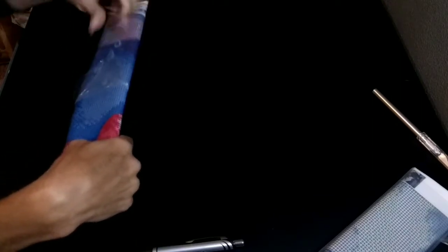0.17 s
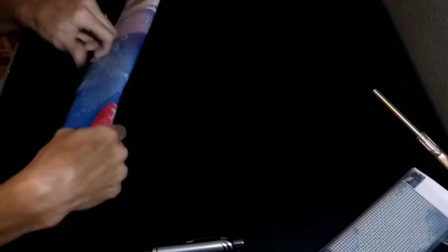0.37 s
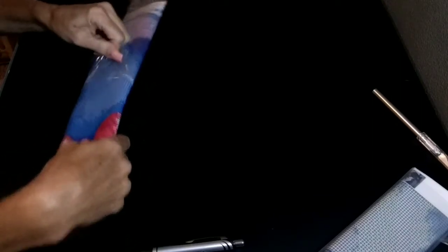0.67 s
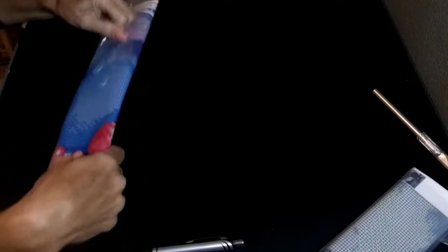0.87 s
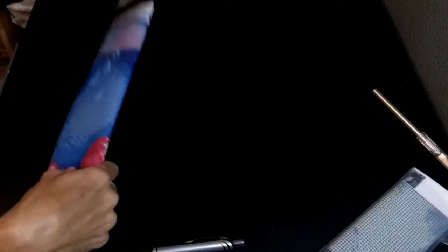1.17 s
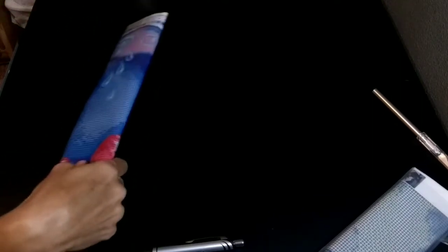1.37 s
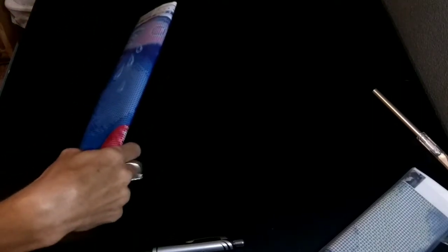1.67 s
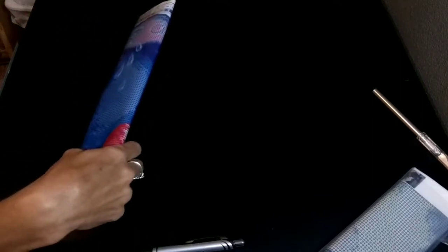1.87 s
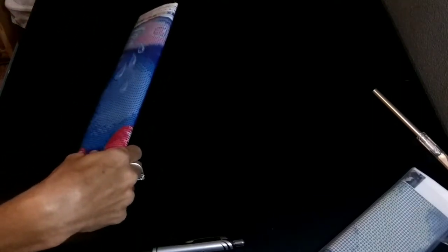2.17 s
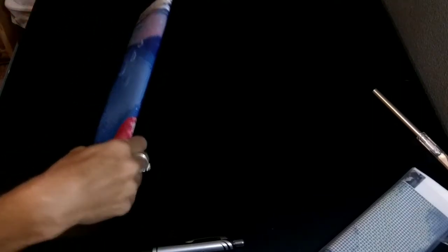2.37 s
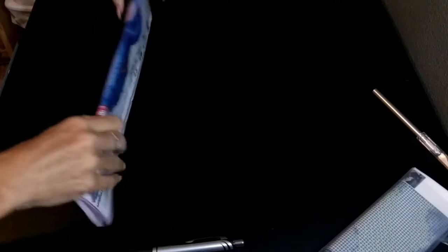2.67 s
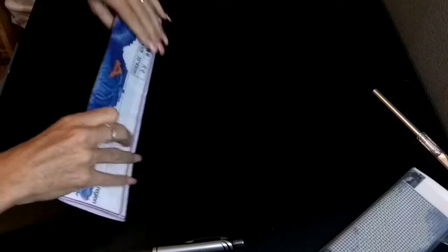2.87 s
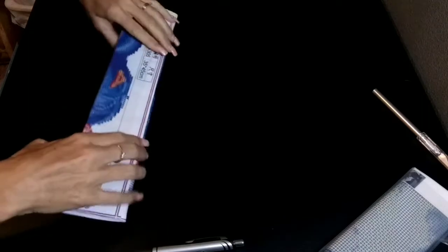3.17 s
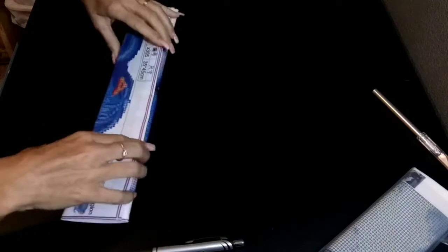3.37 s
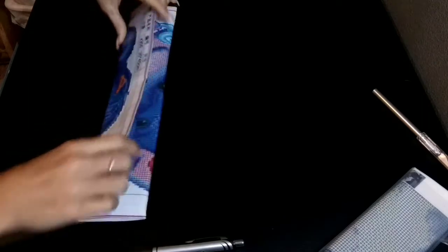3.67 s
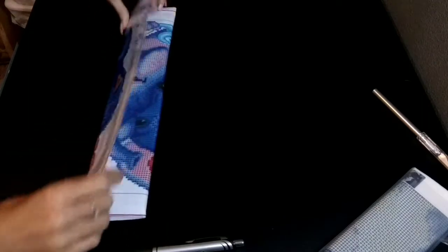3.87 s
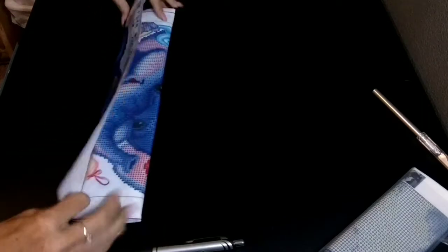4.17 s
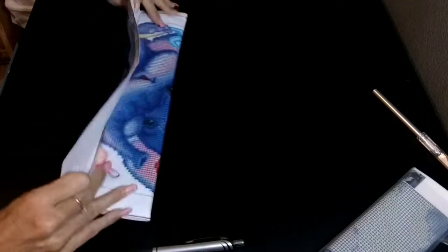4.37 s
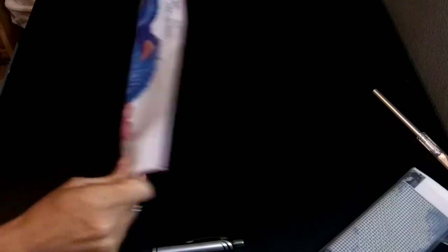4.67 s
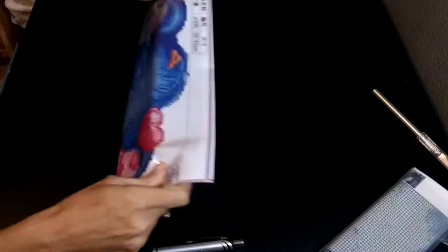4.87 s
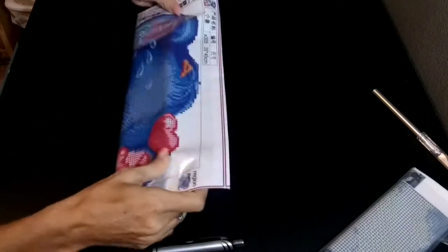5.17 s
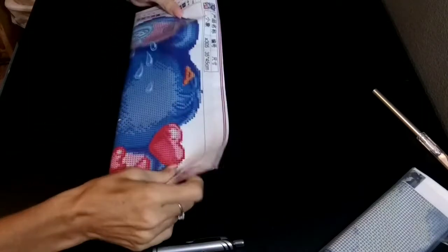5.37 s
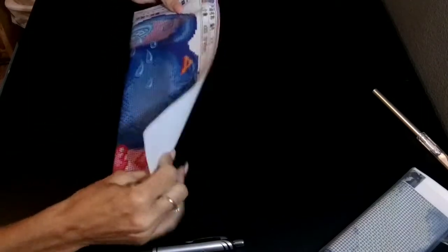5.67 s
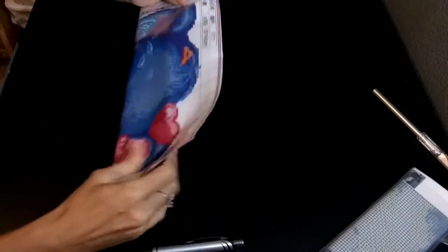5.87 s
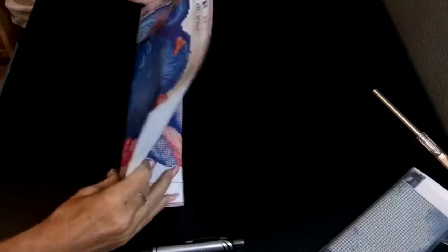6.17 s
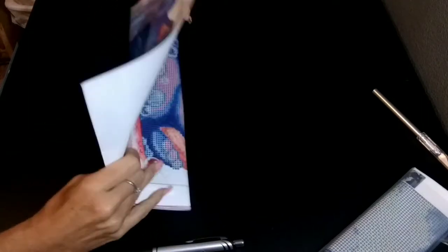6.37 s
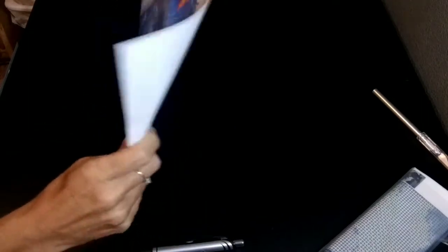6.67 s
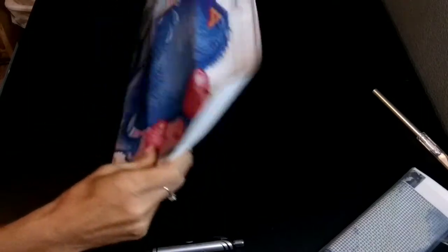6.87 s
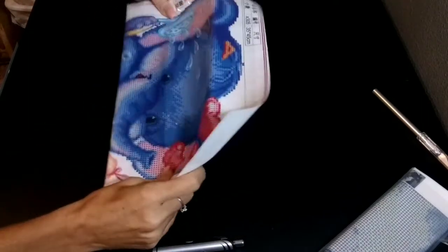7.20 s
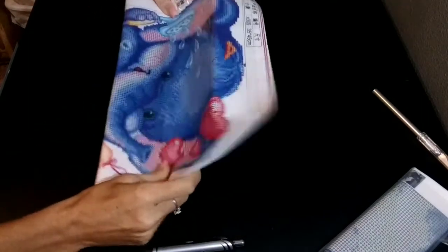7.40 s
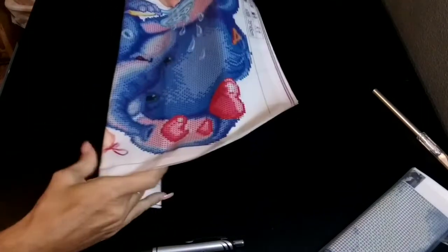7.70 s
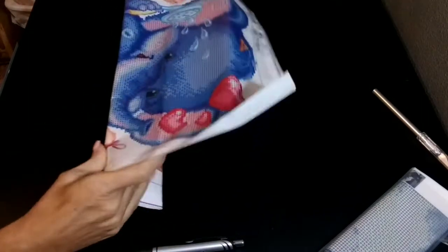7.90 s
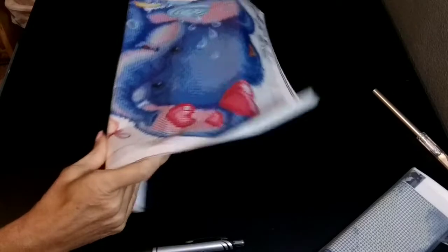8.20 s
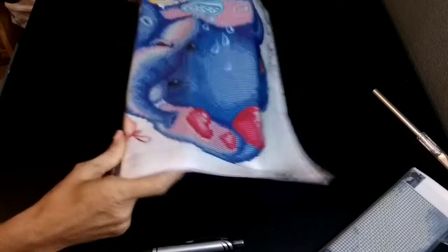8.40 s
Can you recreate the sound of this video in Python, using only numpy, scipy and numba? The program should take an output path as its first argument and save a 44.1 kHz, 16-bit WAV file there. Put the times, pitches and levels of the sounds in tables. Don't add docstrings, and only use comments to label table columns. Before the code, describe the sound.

Thin crisp film crackles and slides off a stiff coated sheet, then the sheet unrolls with rattling snaps and low hollow desk thumps.

```python
import sys
import numpy as np
from scipy import signal
from scipy.fft import rfft, irfft
from scipy.io import wavfile
from scipy.ndimage import uniform_filter1d
from numba import njit

SR = 44100
rng = np.random.default_rng(int(sys.argv[2]) if len(sys.argv) > 2 else 0)


def field_ratio(decibels):
    return 10 ** (np.asarray(decibels, dtype=float) / 20)


def digitize_waveform(pressure):
    field = np.atleast_2d(pressure).T
    bounded = np.clip(field, -1, 1)
    quanta = np.round(bounded * 32767).astype(np.int16)
    wavfile.write(sys.argv[1], SR, quanta)


N = 376613

# frequency in Hz, density in dB per Hz.
AIR_SPECTRUM = [(30, 2), (80, 11.5), (300, -2.5), (700, -11), (1500, -12), (4000, -16.5), (8000, -32),
                (16000, -21.5)]
# frequency in Hz, density in dB per Hz.
DRIFT_SPECTRUM = [(2, -15), (30, -10.5), (300, -21.5), (16000, -64)]
# frequency in Hz, gain in dB, time to fall 60 dB in seconds.
DESK_MODES = [(83, -3, 0.43), (105, 0.5, 0.18), (139, 7.5, 0.28), (176, 6, 0.31), (206, -1, 0.23),
              (266, 1.5, 0.2), (331, -5.5, 0.058), (398, -3.5, 0.22), (496.6, -9.5, 0.23),
              (545.5, -5.5, 0.32), (640, -9, 0.15)]
# frequency in Hz, width in Hz, gain in dB.
SHEET_MODES = [(430, 78, 0), (586, 47, 6), (640, 105, 4), (747, 166, 6.5), (960, 300, 4.5),
               (1216, 402, 5.5), (1714, 1260, -5.5)]
# frequency in Hz, width in Hz, gain in dB.
COATING_MODES = [(2340, 590, 1), (3550, 3170, 6), (4530, 3860, 2)]
# frequency in Hz, density in dB per Hz.
FILM_SPECTRUM = [(3000, -9.5), (5500, -7.5), (7500, -6), (10000, -1), (12500, -4.5), (15500, 2.5)]
# frequency in Hz, density in dB per Hz.
WRAP_SPECTRUM = [(3000, -5), (6000, -5.5), (10000, -3.5), (15500, -5.5)]
# start in seconds, level in dB, pitch struck in Hz, push length in seconds.
DESK_BLOWS = [(1.256, -40.5, 143, 0.0016), (1.3, -38.5, 83, 0.0064), (2.212, -44.5, 226, 0.0034),
              (3.17, -49, 298, 0.0029), (3.41, -40, 162, 0.0044), (4.28, -36, 413, .004),
              (6.199, -38, 406, 0.0064), (6.312, -32.5, 516, 0.0054), (3.387, -38.5, 272, 0.0078),
              (3.389, -38.5, 119, 0.0042), (3.88, -50, 266, 0.032), (4.0, -54, 272, 0.0097),
              (4.15, -45.5, 266, 0.0071), (4.278, -22.5, 139, 0.0046), (4.283, -32.5, 265, 0.0054),
              (5.12, -50, 135, 0.0039), (5.297, -41, 126, 0.0025), (5.3, -36.5, 288, 0.0014),
              (6.115, -40.5, 262, 0.0053), (6.184, -44, 330, 0.0022), (6.2, -30.5, 136, 0.0043),
              (6.205, -33, 250, 0.0053), (6.298, -34, 140, 0.0025), (6.311, -28, 134, 0.0077),
              (6.324, -32, 220, 0.0034), (6.574, -36.5, 145, 0.0019), (6.62, -41, 82, 0.0064),
              (6.725, -49, 85, 0.0078), (6.728, -40.5, 242, 0.0017), (7.02, -40.5, 105, 0.004),
              (7.022, -40.5, 266, 0.0043), (7.06, -39, 87, 0.0051), (7.227, -33, 139, 0.0016),
              (7.228, -43, 305, 0.0017), (8.47, -42, 100, 0.013)]
# start in seconds, level in dB, fold pitch in Hz, crack in dB re
SNAPPING_FOLDS = [(0.026, -40.5, 540, -22), (0.339, -30, 650, -22), (0.707, -40.5, 563, 4),
                  (1.26, -37, 730, -12), (2.141, -34, 1290, 3), (2.214, -40, 493, -4), (2.952, -39.5, 457, 8.5),
                  (3.39, -42.5, 430, -19), (4.015, -41, 970, -1), (4.27, -19, 1260, -3.5),
                  (4.277, -17.5, 520, -7), (4.288, -33, 640, -6), (4.954, -34.5, 780, -18),
                  (5.267, -37, 655, -12.5), (5.301, -29.5, 960, -16), (5.747, -27.5, 1320, -15),
                  (6.0402, -30, 1300, -18), (6.114, -40.5, 418, 3), (6.185, -35, 1280, -19),
                  (6.197, -26.5, 397, -30), (6.299, -21.5, 1270, -1), (6.311, -23, 460, -1.5),
                  (6.5743, -29, 453, -18), (7.021, -34.5, 480, -20), (7.2256, -16.5, 1340, -9),
                  (7.2344, -23, 756, -20), (7.243, -28.5, 790, -22), (7.644, -39.5, 980, 6),
                  (7.791, -39.5, 960, -6), (8.352, -32, 1320, -12), (8.449, -28.5, 740, -19),
                  (.585, -47, 860, 5), (.693, -48, 460, -1.5), (.36, -49, 690, -25), (1.48, -44, 1300, 0),
                (3.148, -46.5, 650, -20), (6.054, -36, 800, -15), (4.16, -48, 620, -18),
                (4.19, -46, 640, -20), (6.258, -35, 640, -13), (6.727, -42.5, 430, 9),
                (6.742, -30.5, 1170, -7), (6.89, -47, 1100, -6), (7.114, -39, 1060, -12),
                (7.154, -42, 974, -16), (7.899, -37, 1360, 7), (8.275, -35, 810, -4), (8.41, -33, 560, -15),
                (8.428, -31, 600, -19), (3.17, -41, 1450, 6), (6.2, -42, 650, -20), (7.04, -38.5, 400, -27),
                (8.312, -40, 900, 5)]
# peak in seconds, sheet level in dB, swell in seconds per 10 dB,
# fade in seconds per 10 dB, film brightness in dB.
PULL_STROKES = [(.03, -52, 6, 0.02, -6), (.31, -60, 0.11, 0.04, 1.5), (.59, -57, 0.13, 0.06, 2.5),
                (0.713, -51.5, 0.03, 0.02, 1), (.95, -49.5, 0.13, 0.1644, 3.5), (1.2, -54, 0.04, 0.04, 2.5),
                (1.26, -57, 0.1, 0.26, 0), (1.49, -57.5, -0.23, 0.17, 10.5), (1.54, -62.5, -0.6, 0.21, 0),
                (1.71, -61, -0.39, 0.06, 11), (1.81, -62.5, -0.46, 0.01, 14), (2.04, -67, -0.13, 0, 12),
                (2.15, -58, 0.17, 0, 5), (2.226, -52, 0.07, 0.07, 2)]
TURN_STROKES = [
    (2.5, -57.5, 0.28, 0.18, -7.5),
    (2.75, -62.5, 0.055, .06, -7),
    (2.83, -51, 0.089, 0.068, -17.5),
    (2.97, -51.5, 0.044, 0.051, -12.5),
    (3.19, -55, 0.043, 0.11, -12),
    (3.32, -71, .03, .05, -6),
    (3.69, -60, 0.14, 0.37, -7),
    (4.02, -59.5, 0.19, 0.074, -0.5),
    (4.2, -55, 0.056, 0.057, -9),
]
UNROLL_STROKES = [(4.3, -47.5, 0.064, 0.09, -5.5), (4.71, -54.5, 0.46, 0.029, -6),
                  (4.92, -59, 0.49, 0.24, 1), (5.07, -64, .1, 0.089, 7.5), (5.33, -50, 0.14, 0.055, -2),
                  (5.56, -54.5, 0.13, 0.072, 1), (5.8, -60, 0.12, 0.15, 8.5), (6.09, -51, 0.34, 0.1, -3.5),
                  (6.3, -48, 0.1, 0.11, -12), (6.42, -61, 0.1, 0.17, 6.5), (6.54, -53.5, 0.048, 1, -3),
                  (6.78, -60, 0.14, 0.053, 9), (6.94, -54.5, 0.045, 0.11, 6.5),
                  (7.16, -72, 0.036, 0.13, -4), (7.23, -48, 0.024, 0.07, -4), (7.32, -54, 0.19, 0.019, 5.5),
                  (7.518, -50.5, 0.12, 0.071, 2), (7.59, -60, 0.045, 0.06, 4), (7.65, -55, 0.07, 0.16, 1.5),
                  (7.91, -52.5, 0.11, 0.091, 2), (8.11, -57, 0.046, .1, 5), (8.21, -53.5, 0.13, 0.14, 0.5),
                  (8.3, -48.5, 0.12, 0.034, -5), (8.33, -55, 0.033, 0.1, 8.5), (8.49, -41, 0.1, 0.077, -7)]
SKIN_STROKES = [
    (1.48, -64, -0.07, 0.1, 2),
    (1.699, -64, 0, 0.06, -1),
    (1.8, -73, -0.4, 0, -5),
    (2.24, -64, 0.22, -0.18, -13),
    (3.04, -69, -0.26, 0, -15),
    (3.199, -65.5, 0, 0.1, -16),
    (3.85, -70, 0.2, 0.13, -11.5),
    (6.75, -61, -0.07, 0, -4),
]
TASK_SLIDE_DB = [-3, -2.5, -4.5, 14]
SLIDE_SHARE = 0.54
STILL_HANDS_DB = [-71.5, -88, -94]
# start in seconds, peak level in dB, pitch in Hz.
WRAP_TICKS = [(0.4935, -44, 9900), (0.4962, -47, 8600), (0.5305, -41, 5800), (0.5366, -46, 7400),
              (0.5548, -39, 10500), (0.5692, -40, 9400), (0.5849, -31.5, 5400), (0.5873, -29.5, 7300),
              (0.611, -31.5, 9000), (0.6949, -46, 8000), (0.7057, -56, 7300), (0.7628, -31.5, 9500),
              (0.8086, -38.5, 7800), (0.8184, -40, 7100), (0.8239, -47, 9700), (0.8676, -34, 8900),
              (0.8806, -42, 8900), (0.9392, -32, 9500), (0.943, -27, 9100), (0.9732, -27.5, 11700),
              (0.9924, -30, 11400), (1.0072, -29.5, 11500), (1.03, -29.5, 8000), (1.2077, -28.5, 9800),
              (1.2635, -32, 9500), (1.2993, -39, 9900), (1.4807, -40, 5000), (1.484, -38, 4800),
              (1.5175, -29, 4670), (1.522, -38, 6000), (1.5646, -35.5, 6700), (1.5705, -35, 10700),
              (1.5866, -37, 10400), (1.5925, -52, 7400), (1.6062, -42, 8300), (1.642, -33, 10500),
              (1.6537, -32.5, 7300), (1.6965, -29.5, 5600), (1.698, -30.5, 8400), (1.7152, -38, 6900),
              (1.7834, -37, 9200), (1.8005, -35.5, 8900), (1.8742, -41, 8900), (1.962, -34.5, 8800),
              (2.0242, -39.5, 9600), (2.0267, -40, 10000), (2.1429, -27, 9500), (2.145, -30, 11400),
              (2.1612, -37, 10800), (2.178, -36, 8400), (2.2064, -38, 9400), (2.8307, -40, 8060),
              (2.9102, -44, 10600), (2.9519, -45, 5600), (3.9709, -42, 10700), (4.0182, -39, 8500),
              (4.175, -49, 8800), (4.271, -44, 4900), (4.274, -39, 4200), (4.29, -37, 9500)]
FIRST_FLAP_TICKS = [(4.361, -32.5, 11700), (4.3629, -34, 11100), (4.3679, -36.5, 12900),
                    (4.4042, -35, 12400), (4.4936, -33.5, 8250), (4.542, -37, 12600),
                    (4.5784, -36.5, 10300), (4.6101, -51, 11800), (4.7418, -31, 10900),
                    (4.7483, -31, 12900), (4.823, -37, 11700), (4.8404, -36, 10800), (4.9109, -44, 9800),
                    (4.9574, -33, 10100), (5.004, -32, 11300), (5.0061, -38, 12100), (5.0141, -36, 12400),
                    (5.051, -32, 10100), (5.057, -32, 10700), (5.0662, -41, 11600), (5.0941, -37, 13200),
                    (5.1467, -35.5, 12200), (5.1847, -31, 11600), (5.1888, -34, 12900), (5.19, -28, 13600),
                    (5.198, -39, 13000), (5.2086, -34, 12500), (5.216, -39, 12500), (5.242, -26.5, 13400),
                    (5.2811, -35, 6600), (5.3011, -30, 12900), (5.3362, -37, 9900), (5.3927, -43, 11500),
                    (5.409, -40, 12200), (5.48, -34, 10000), (5.4835, -36, 12900), (5.5125, -37, 12100),
                    (5.5527, -37, 12900), (5.573, -33, 12000), (5.581, -31, 12600), (5.686, -34.5, 9500),
                    (5.6917, -30.5, 10800), (5.695, -28, 12200), (5.7026, -34, 12800), (5.7656, -34, 11300),
                    (5.7796, -32, 13800), (5.8254, -44, 11600), (5.8357, -31, 10200), (5.8638, -45, 10900),
                    (5.9107, -44, 12700), (5.9278, -39, 13700), (5.9427, -38, 12800), (5.9704, -39, 10800),
                    (6.0579, -39, 10200), (6.098, -32, 10500), (6.1014, -36, 10700), (6.1354, -22, 11100)]
SECOND_FLAP_TICKS = [(6.2305, -43, 11700), (6.2528, -38, 10200), (6.2758, -38, 9900), (6.2979, -48, 4800),
                     (6.3843, -39, 12200), (6.431, -40, 12400), (6.6193, -37, 10600), (6.662, -38, 10400),
                     (6.7584, -30, 13500), (6.8323, -42, 10000), (6.8416, -43, 11500), (6.9129, -36, 10600),
                     (6.919, -34, 12800), (6.9303, -36.5, 12000), (6.9255, -36, 12000),
                     (6.9405, -29, 12900), (6.947, -33, 12000), (6.9604, -27, 11700), (7.0225, -32, 11800),
                     (7.0326, -40, 10800), (7.0346, -34, 11100), (7.0752, -54, 12100), (7.1044, -43, 11000),
                     (7.1147, -35, 8400), (7.1212, -41, 10900), (7.1762, -38, 8700), (7.192, -39, 13700),
                     (7.1995, -34, 13000), (7.2958, -41, 8700), (7.2999, -40, 13000), (7.314, -42, 10500),
                     (7.3235, -38, 10500), (7.4285, -42, 11600), (7.4373, -29, 13300),
                     (7.5037, -31.5, 10000), (7.646, -42, 10900), (7.6533, -34, 13800),
                     (7.7047, -38, 12300), (7.741, -39, 10300), (7.7725, -38, 10900), (7.787, -40, 11900),
                     (7.9016, -33, 11900), (7.906, -33, 7100), (7.9082, -38, 10900), (7.9967, -36, 10400),
                     (8.0146, -39, 11000), (8.0516, -37, 8300), (8.0591, -46, 10200), (8.103, -30, 8000),
                     (8.1423, -30, 9100), (8.1575, -31, 11300), (8.2406, -29, 9900), (8.3032, -42, 11800),
                     (8.3149, -28, 13100), (8.43, -36, 9100), (8.4768, -29, 9300), (8.4906, -23, 12300)]
COATING_SHARE_DB = [-12.5, -30, -25]
# start in seconds, level in dB.
DULL_CRACKS = [(0.604, -40), (4.018, -37), (4.2724, -25), (4.2911, -23.5), (4.7417, -41.5), (4.958, -43),
               (5.279, -32.5), (5.4665, -35.5), (6.252, -33), (6.3024, -23.5), (6.727, -32.5),
               (7.0218, -34), (7.1138, -46), (7.229, -30), (7.791, -39.5), (8.352, -33), (7.9968, -33.5)]
# frequency in Hz, scatter in radians.
PHASE_SCATTER = [(900, 0.01), (1700, 0.72), (2800, 0.83), (6000, 0.96), (9000, 1), (11000, 0.74)]
LEFT_RESPONSE = [0.24, 0.45, 0.16]


def level(x, db):
    return x * field_ratio(db) / np.sqrt(np.mean(x ** 2))


@njit
def svf(x, hz, width):
    y, band, low = np.empty(len(x)), 0., 0.
    g, k = np.tan(np.pi * hz / SR), width / hz
    for i in range(len(x)):
        v = (band + g * (x[i] + 1e-18 - low)) / (1 + g * (g + k))
        band, low, y[i] = 2 * v - band, low + 2 * g * v, k * v
    return y


def body(x, modes):
    out = np.zeros(len(x))
    for k, (hz, width, db) in enumerate(modes):
        out += (-1) ** k * field_ratio(db) * svf(x, 1. * hz, 1. * width)
    return out


def fade(x, length_s):
    return signal.lfilter([1], [1, -np.exp(-1 / (length_s * SR))], x)


def coloured(x, points):
    hz, db = np.transpose(points)
    grid = np.log(np.fft.rfftfreq(N, 1 / SR) + 1)
    return irfft(rfft(x) * field_ratio(np.interp(grid, np.log(hz), db)), N)


def buckles(per_s, spread_db, length_s, swell_s=.00002):
    when, size, noise = rng.random(N), rng.exponential(size=N), rng.standard_normal(N)
    impulses = (when < per_s / SR) * field_ratio(np.minimum(spread_db * size, 30))
    return noise * fade(fade(impulses, length_s), swell_s)


def still_air():
    hum_spectrum = AIR_SPECTRUM[:4] + [(1500, -15)]
    hum = np.array([coloured(rng.standard_normal(N), hum_spectrum), np.zeros(N)])
    return level(coloured(rng.standard_normal(N), AIR_SPECTRUM), -60.5) + level(hum, -64.5)


def room(x):
    t60_s, tail_db, top_hz = 0.21, -12.5, 4500
    t = np.arange(int(.5 * SR)) / SR
    tail = rng.standard_normal((2, len(t))) * 1000. ** (-t / t60_s) * (t > .004)
    tail = signal.lfilter(*signal.butter(1, top_hz, fs=SR), tail + 2.0 * tail[1])
    tail *= field_ratio(tail_db) / np.sqrt(np.sum(tail[1] ** 2))
    return signal.fftconvolve(x[None], tail, axes=1)[:, :N]


def hands():
    t = np.arange(0, N + 64, 64) / SR
    power = field_ratio(2 * np.array(STILL_HANDS_DB))[:, None] * np.ones(len(t))
    tasks = PULL_STROKES, TURN_STROKES, UNROLL_STROKES, SKIN_STROKES
    for strokes, slide_db in zip(tasks, TASK_SLIDE_DB):
        for s, db, swell_s, fade_s, bright_db in strokes:
            before, after = (s - t) / max(swell_s, .01), (t - s) / max(fade_s, .01)
            shape_db = db - 10 * np.maximum(before, after)
            part_db = np.array([[0], [slide_db + SLIDE_SHARE * bright_db], [bright_db]])
            power = power + field_ratio(2 * (shape_db + part_db))
    return [np.interp(np.arange(N) / SR, t, np.sqrt(p)) for p in power]


def desk(x):
    return body(x, [(hz, np.log(1000) / np.pi / t60, db) for hz, db, t60 in DESK_MODES])


def rumble():
    rest_db, stroke_db, share = -73, -70, 0.54
    gain = field_ratio(rest_db) + field_ratio(stroke_db) * (hands()[0] / field_ratio(-52.0)) ** share
    return gain * level(desk(buckles(per_s=140, spread_db=2.5, length_s=0.014)), 7.03)


def blows():
    t = np.arange(int(.25 * SR)) / SR
    push = np.zeros(N + len(t))
    for s, db, hz, length_s in DESK_BLOWS:
        phase = t / max(length_s, .002)
        swell = phase * np.exp(1 - phase)
        push[int(s * SR):][:len(t)] += field_ratio(db) * swell * np.sin(2 * np.pi * hz * t)
    return desk(push[:N]) * field_ratio(3.5) + push[:N] + rumble()


def film(x):
    on = np.arange(N) < 3.2 * SR
    return coloured(x * on, WRAP_SPECTRUM) + coloured(x * ~on, FILM_SPECTRUM)


def rustle():
    sheet, slide, sizzle = hands()
    crinkle = level(buckles(per_s=320, spread_db=2.5, length_s=0.00074), 0)
    skin = level(buckles(per_s=110, spread_db=3.0, length_s=.022, swell_s=.004), 0)
    rub = level(buckles(per_s=110, spread_db=2.5, length_s=0.018, swell_s=0.0006), 0)
    out = sheet * level(body(0.51 * crinkle + skin, SHEET_MODES), 1.92)
    out += slide * level(svf(body(0.48 * crinkle + skin, COATING_MODES), 2850.0, 2300.0), 2.34)
    return out + sizzle * level(film(0.53 * crinkle + 0.84 * skin + 0.91 * rub), 5.0)


def snaps():
    bounce_db, click_db = 3.5, 33
    t = np.arange(int(.2 * SR)) / SR
    fold, crack = np.zeros((2, N + len(t)))
    for s, db, hz, crack_db in SNAPPING_FOLDS:
        grain, wobble = rng.standard_normal((2, len(t)))
        bounces = field_ratio(bounce_db * level(uniform_filter1d(wobble, size=150), 0))
        rattle_s = max(0.018 + .0003 * (db + 24), .002)
        rattle = grain * bounces * np.exp(-t / rattle_s) + field_ratio(click_db) * (t == 0)
        ring = svf(svf(rattle, 1. * hz, 3.16 * hz), 1. * hz, 0.5 * hz)
        bright = svf(body(rattle * np.exp(-t / 0.12), COATING_MODES), 1600.0, 1500.0)
        fold[int(s * SR):][:len(t)] += field_ratio(db) * ring / np.max(np.abs(ring))
        crack[int(s * SR):][:len(t)] += field_ratio(db + crack_db) * bright / np.max(np.abs(bright))
    fold, crack = fold[:N], crack[:N]
    return body(fold, SHEET_MODES) * field_ratio(2.0) + fold * field_ratio(-6.5) + crack * field_ratio(-3.5)


def crease_ticks():
    rise_s = .000075
    tick, click = np.zeros((2, N)), np.zeros(N)
    t = np.arange(48)[:, None] / SR
    for rows, coating_db in zip((WRAP_TICKS, FIRST_FLAP_TICKS, SECOND_FLAP_TICKS), COATING_SHARE_DB):
        s, db, hz = np.transpose(rows)
        at = ((s - rise_s) * SR).astype(int)
        tick[:, at] = field_ratio(db), field_ratio(db + coating_db)
        turn = hz * t + rng.random(len(s))
        swell = t / rise_s * np.exp(1 - t / rise_s)
        click[at + np.arange(len(t))[:, None]] += field_ratio(db) * swell * np.sin(2 * np.pi * turn)
    s, db = np.transpose(DULL_CRACKS)
    tick[1, (s * SR).astype(int)] = field_ratio(db)
    return tick, click


def creases():
    tick, click = crease_ticks()
    echo, echo_lag = field_ratio(-10), int(.0067 * SR)
    tick += echo * np.roll(tick, echo_lag, axis=1)
    click += echo * np.roll(click, echo_lag)
    film_tick, coating_tick = tick
    noise = rng.standard_normal(N)
    burst = 2.8 * coating_tick + noise * (fade(coating_tick, 0.00039) + 0.18 * fade(coating_tick, 0.022))
    tear = fade(film_tick, 0.00088) * field_ratio(-10.5)
    after = film(noise * (fade(film_tick, 0.018) * field_ratio(-20) + tear))
    coating = body(burst, COATING_MODES) * field_ratio(-0.5) + body(burst, SHEET_MODES) * field_ratio(6.5)
    return click * field_ratio(2.0) + after + coating


def scene():
    canvas, boom = rustle() + snaps() + creases(), blows()
    boom = np.array([np.roll(boom, -58) * field_ratio(2.0), boom])
    return canvas + room(canvas) + boom + still_air()


def blur(x):
    hz, _, grains = signal.stft(x, SR, window="cosine", nperseg=256)
    spread = np.interp(hz, *np.transpose(PHASE_SCATTER))[:, None]
    kept = np.exp(-spread ** 2)
    turn = np.exp(1j * spread * rng.standard_normal(grains.shape[1:]))
    grains = grains * turn / np.sqrt((1 + kept) / 2)
    return signal.istft(grains, SR, window="cosine", nperseg=256)[1][:, :N]


def ports(dry):
    response = np.r_[np.zeros(19), LEFT_RESPONSE]
    return np.array([-signal.lfilter(response, [1], dry[0]), dry[1]])


def low_pass(x):
    return signal.sosfilt(signal.butter(12, 16640, fs=SR, output="sos"), x)


def record(dry):
    sharp, loose = ports(dry), ports(blur(dry))
    middle, difference = (sharp[0] + sharp[1]) / 2, (loose[0] - loose[1]) / 2
    paired = rfft(middle + difference * np.array([[1], [-1]]))
    treble = rfft([loose[0], sharp[1]])
    both = irfft(np.where(np.fft.rfftfreq(N, 1 / SR) < 10400, paired, treble), N)
    both[0] += level(coloured(rng.standard_normal(N), DRIFT_SPECTRUM), -63.0)
    both += np.array([[0.0075], [-0.00033]])
    both += field_ratio(-76) * rng.standard_normal((2, N))
    top_cut = signal.ellip(10, .2, 60, 15450, fs=SR, output="sos")
    return low_pass(signal.sosfilt(top_cut, both))


dry = scene()
out = record(dry)
digitize_waveform(out)
```